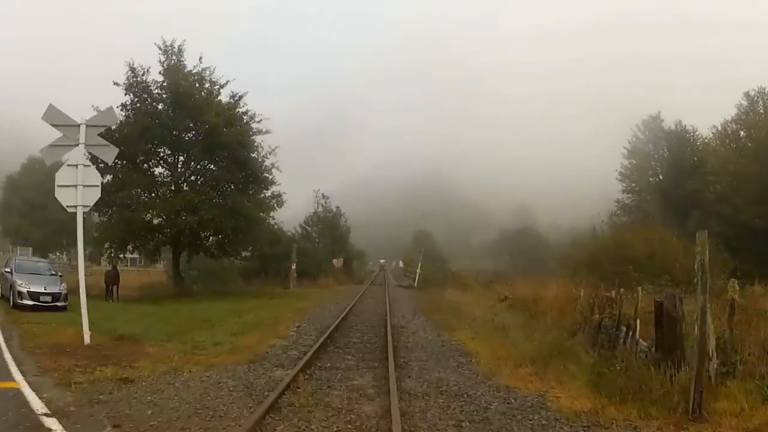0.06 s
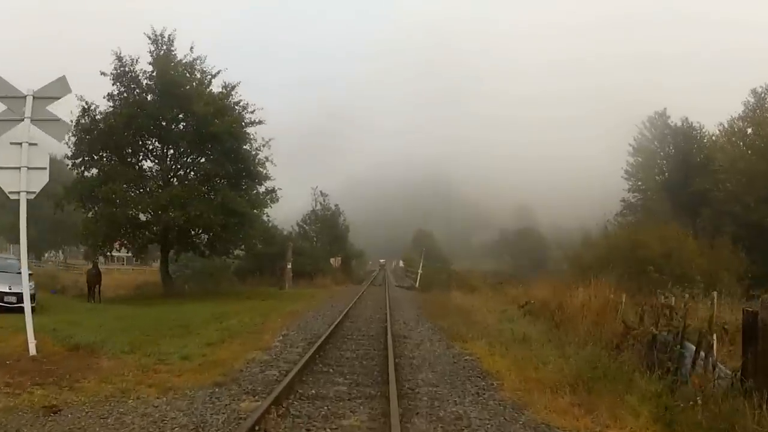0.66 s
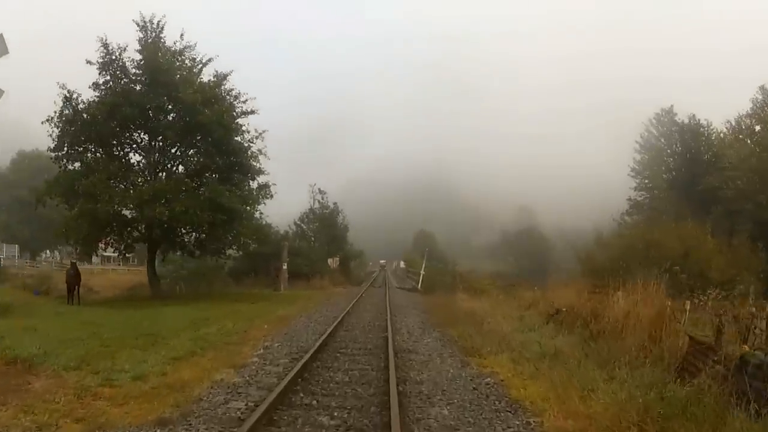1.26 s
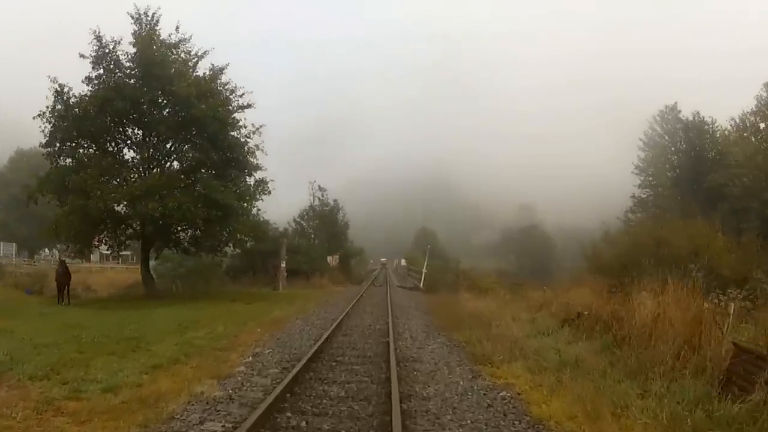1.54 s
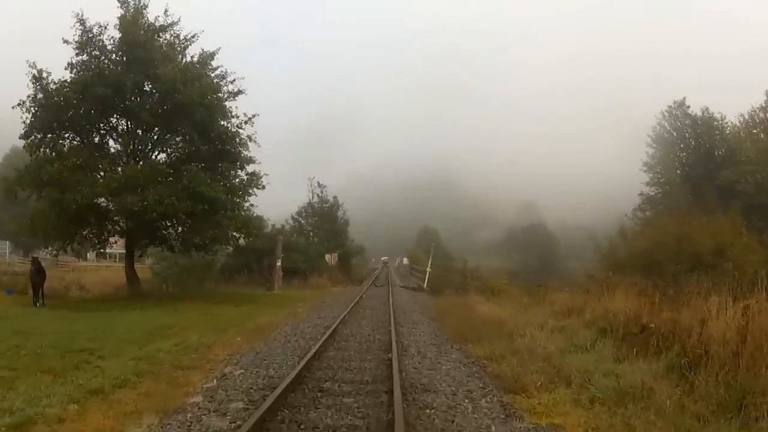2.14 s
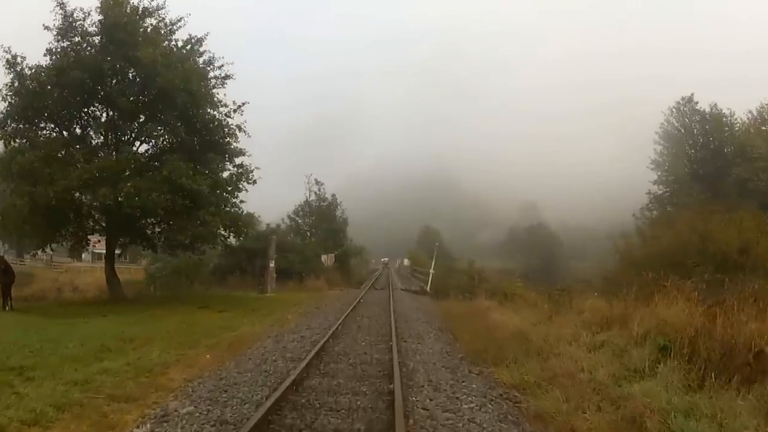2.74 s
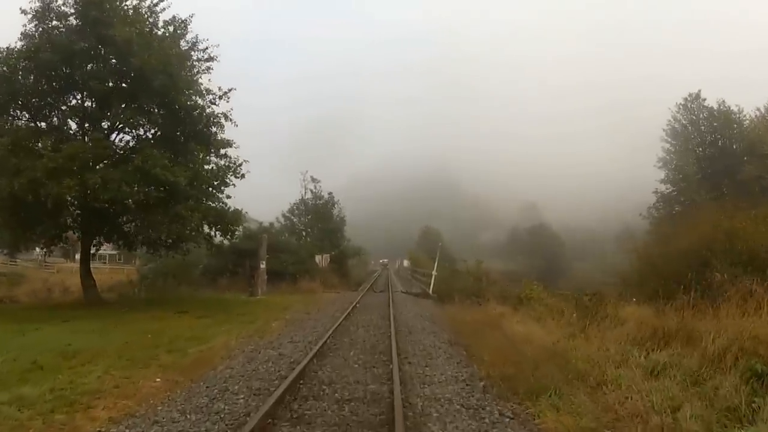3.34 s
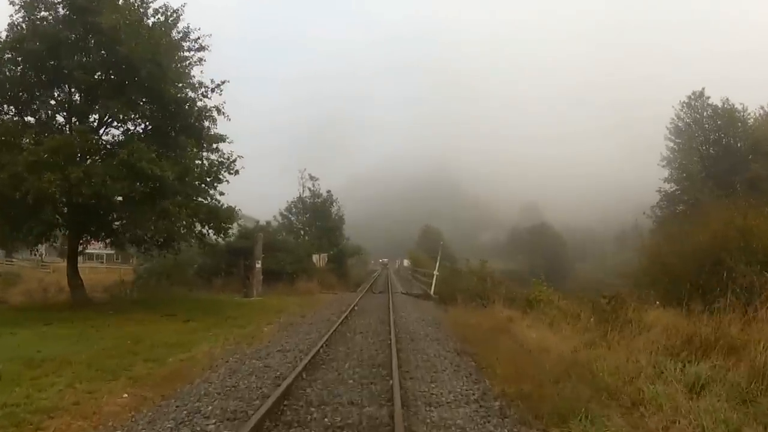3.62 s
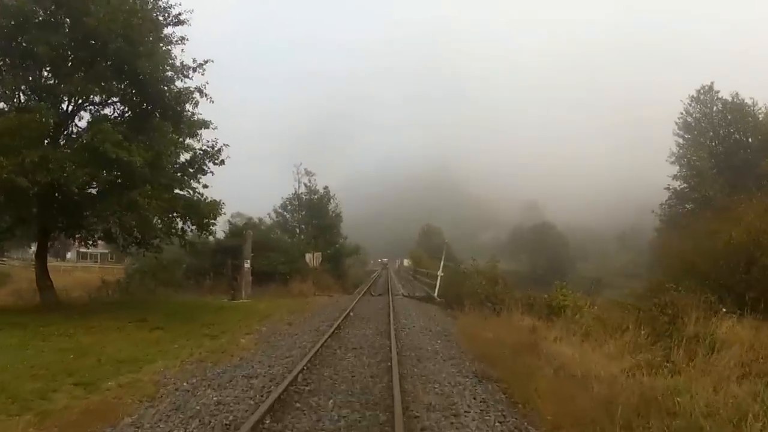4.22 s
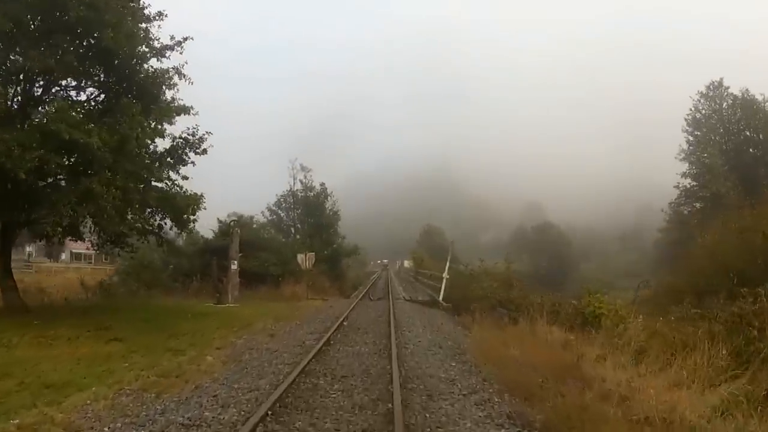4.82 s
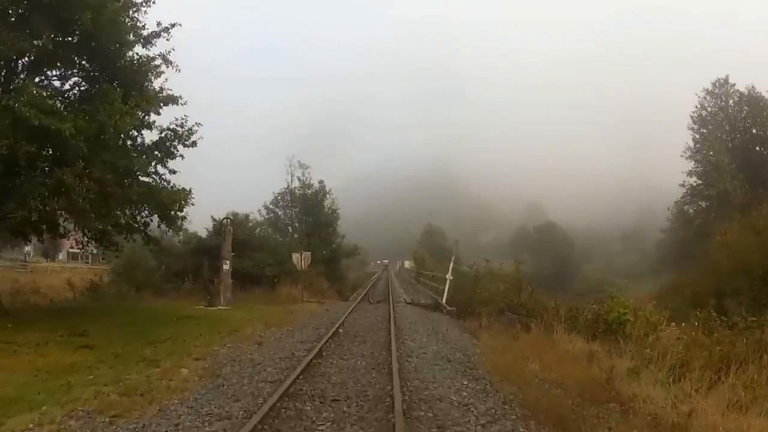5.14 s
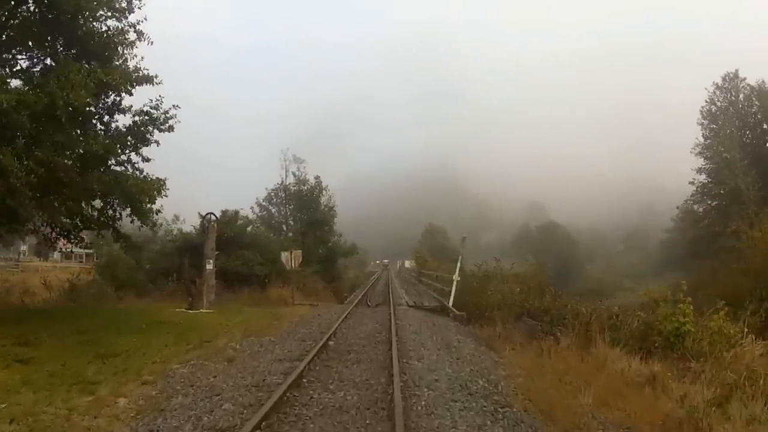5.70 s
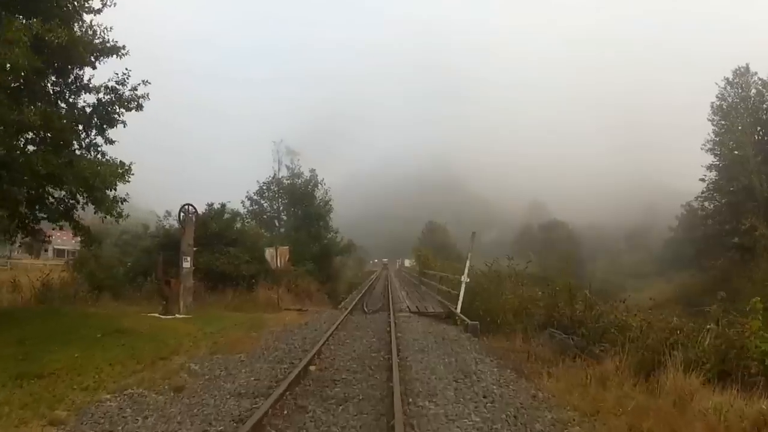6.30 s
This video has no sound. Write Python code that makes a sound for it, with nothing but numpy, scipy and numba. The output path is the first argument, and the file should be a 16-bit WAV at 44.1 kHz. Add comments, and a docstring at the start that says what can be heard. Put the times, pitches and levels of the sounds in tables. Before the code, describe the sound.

Heard from on board, a motorized rail cart's steel wheels drone and rumble on the rails while loose fittings knock.

```python
"""A small engine-powered rail cart rolls along a track at a steady speed, heard from on board.
Rough rail drives the steel wheels, frame and body into forced vibration: a drone over a rumble.
A slow engine thuds in a harmonic series, loose fittings knock, grit hisses under the treads,
a panel groans twice and a gear whines. The camera ducks after loud knocks, and its
sample-and-hold adds spectral images, heard as a thin sizzle."""
import sys
import numpy as np
from scipy import signal
from scipy.fft import rfft, irfft
from scipy.io import wavfile
from scipy.ndimage import uniform_filter1d
from numba import njit

SR = 44100
rng = np.random.default_rng(int(sys.argv[2]) if len(sys.argv) > 2 else 0)


def unload_audio(sound):
    """Save the sound as a 16-bit wav file, at the path given as the first command line argument."""
    columns = np.transpose(np.atleast_2d(sound))
    # keep every value between -1 and 1, then stretch to whole-number steps
    steps = np.round(np.clip(columns, -1, 1) * 32767)
    wavfile.write(sys.argv[1], SR, steps.astype(np.int16))


N = 284886

# normal modes of the light steel fittings: frequency_hz, bandwidth_hz, gain_db
FITTING_MODES = [(1180, 27, 3), (1285, 13, -5.5), (1557, 18, -6), (1878, 46, 0), (2051, 40, 3.5),
                 (2599, 47, 1), (2930, 41, -14), (3202, 60, 0.5), (3324, 80, -4.5), (3636, 54, -4),
                 (3870, 54, -6.5), (4320, 39, -12.5), (4886, 114, -11)]


def wheels(db, judder_db):
    """Beating: rail bumps excite the wheels' close modes, which interfere in a quick, uneven growl."""
    # normal modes of the wheels: frequency_hz, bandwidth_hz, gain_db
    wheel_modes = [(567, 27.1, -2), (592, 24.3, 1), (628, 25.6, -3.5)]
    force = bumps(rate_hz=900, scatter_db=2) * undb(judder_db * walk(70))
    return level(contact_damping(ring(force, wheel_modes), span_s=0.081), db)


def contact_damping(x, span_s):
    """Nonlinear damping: rail contact checks a growing swing, so slow swells even out and beats stay."""
    return x / np.sqrt(uniform_filter1d(x ** 2, int(span_s * SR)) + 1e-12)


def frame(firing_phase, db, shake_depth, boom_width_hz):
    """Forced vibration: bumps, modulated twice a firing, drive the frame's rumble and a deck resonance."""
    # frequency response of the frame: frequency_hz, gain_db
    frame_response = [(18, -49), (30, -27.5), (50, -8.5), (85, -6), (120, 0.5), (165, -3), (215, -6.5),
                      (255, -5.5), (290, -9), (350, -8.5), (430, -5), (650, -9), (900, -32.5),
                      (1500, -41.5), (4000, -66.5)]
    # hollow boom of the deck, drifting upward: time_s, centre_hz, level_over_rumble_db
    deck_resonance = [(0, 147.6, -7.5), (1.8, 163.6, -0.5), (2.7, 154.6, -5.5), (3.8, 193, -1.5),
                      (5, 177.6, -7), (6.46, 211.6, -7.5)]
    shaking = 1 + shake_depth * np.cos(2 * firing_phase)
    rumble = colour(shaking * bumps(rate_hz=1500, scatter_db=3.5), frame_response)
    time_s, centre_hz, boom_db = np.transpose(deck_resonance)
    carrier = np.exp(1j * phase_of(np.interp(np.arange(N) / SR, time_s, centre_hz)))
    force = shaking * bumps(rate_hz=900, scatter_db=4)
    # shifting down, low-passing and shifting back gives a narrow band with a moving centre
    lowpass = signal.butter(2, boom_width_hz / 2, fs=SR, output="sos")
    swing = (signal.sosfilt(lowpass, force / carrier) * carrier).real
    boom = level(swing, 0) * curve(np.c_[time_s, boom_db])
    return level(level(rumble, 0) + boom, db)


def body(db):
    """Modal resonance: the body's panels hum at their natural frequencies under rail bumps."""
    # normal modes of the body: frequency_hz, bandwidth_hz, gain_db
    body_modes = [(334, 27, -10.5), (461.4, 11.8, .5), (506.6, 13, -2.5), (699.6, 31, -13.5),
                  (803.3, 23, -14.5), (931, 5.6, -23.5)]
    return level(ring(bumps(rate_hz=900, scatter_db=2.5), body_modes), db)


def engine(firing_phase, uneven_db):
    """Harmonic series: the exhaust thuds once a firing, and each partial wavers with the uneven burn."""
    # exhaust spectrum: harmonic_number, gain_db
    harmonics = [(1, -22), (2, -7.5), (3, -2.5), (4, -7.5), (5, -2.5), (6, -6.5), (7, 0), (8, -2),
                 (10, -2.5)]
    # exhaust level as the engine's effort varies: time_s, level_db
    effort = [(0, -27), (1.2, -30), (2.2, -31), (3, -29.5), (4, -34), (4.6, -30.5), (5.3, -30), (6.46, -30)]
    note = 0
    for number, db in harmonics:
        amplitude = undb(db + uneven_db * walk(9))
        note = note + amplitude * np.cos(number * firing_phase + 2 * np.pi * rng.random())
    return curve(effort) * level(note, 0)


def knocks(thud_t60_s, crack_t60_s, ring_db):
    """Impact excitation: a knock is a hard crack, a clack that rings the fittings and a dull thud."""
    # knocks of wheels and loose fittings: start_s, clack_db, thud_db, clack_t60_s, crack_db
    impacts = [(0.404, -26.5, -20, .02, -45), (0.567, -28, -39, 0.017, -39), (0.897, -41, -39, 0.022, -45),
               (1.201, -22, -6.5, 0.044, -30), (1.209, -22.5, -6, 0.056, -42), (1.224, -25, -25, 0.03, -34),
               (1.595, -27, -11, 0.023, -18), (2.073, -32, -10, 0.028, -34), (2.590, -35, -9.5, 0.04, -28),
               (2.976, -33, -11.5, 0.084, -43), (3.466, -35, -16, 0.029, -49), (4.109, -32, -26, 0.04, -50),
               (4.309, -36, -30, 0.017, -40), (4.605, -30.5, -5, 0.037, -30), (5.602, -33, -31, 0.028, -47)]
    # spectrum of the metallic clack: frequency_hz, gain_db
    clack_spectrum = [(200, 2), (700, 1), (1250, 2.5), (2000, -2), (2700, 0.5), (3600, 2.5), (4500, -13.5),
                      (6000, -19.5)]
    # spectrum of the thud through the frame: frequency_hz, gain_db
    thud_spectrum = [(25, -48), (70, -18), (150, 3), (300, -10), (450, 9.5), (580, 13), (720, -20),
                     (1100, -41), (3000, -56)]
    # spectrum of the hard crack: frequency_hz, gain_db
    crack_spectrum = [(200, -17), (600, 1), (900, -0.5), (1300, 4), (1700, -6), (2100, -14), (4000, -22),
                      (4900, -20.5), (6000, -24)]
    clack, thud, crack = 0, 0, 0
    for start_s, clack_db, thud_db, clack_t60_s, crack_db in impacts:
        clack = clack + burst(start_s, clack_db, clack_t60_s)
        thud = thud + burst(start_s, thud_db, thud_t60_s)
        crack = crack + burst(start_s, crack_db, crack_t60_s)
    metal = colour(clack, clack_spectrum) + level(ring(clack, FITTING_MODES), ring_db)
    return metal + colour(thud, thud_spectrum) + colour(crack, crack_spectrum)


def treads(firing_phase, grit_db, fittings_db, flutter_db, chatter_depth):
    """Shot noise: grit crushed under the treads hisses and fittings shiver, both pulsed by the engine."""
    # spectrum of grit under steel treads: frequency_hz, gain_db
    grit_spectrum = [(400, 0), (900, -4.5), (1250, 1), (1650, -6), (2060, -2.5), (2250, -0.5), (2650, 3),
                     (3100, 0.5), (3500, -3.5), (3850, -8.5), (4300, -12), (5000, -19), (5700, -16.5),
                     (7000, -27.5)]
    chatter = 1 + chatter_depth * (np.cos(firing_phase) + np.cos(2 * firing_phase))
    load = undb(flutter_db * walk(60)) * chatter
    grit = colour(load * bumps(rate_hz=6000, scatter_db=1.5), grit_spectrum)
    shiver = ring(load * bumps(rate_hz=900, scatter_db=6), FITTING_MODES)
    return level(grit, grit_db) + level(shiver, fittings_db)


def groans(hold_s, fade_s, wobble):
    """Single-mode vibration: a panel of the body swings up briefly on one unsteady note."""
    # short groans of the body: start_s, pitch_hz, level_db
    notes = [(2.01, 424, -26.5), (4.719, 462.6, -23)]
    out = 0
    for start_s, pitch_hz, db in notes:
        tone = np.sqrt(2) * np.sin(phase_of(pitch_hz * (1 + wobble * walk(60))))
        out = out + undb(db) * swell(start_s, hold_s, fade_s, fade_s) * tone
    return out


def gear(mesh_hz, wobble, flutter_db):
    """Periodic contact: meshing teeth give a thin whine whose pitch and level waver with the load."""
    # strength of the whine: time_s, level_db
    whine_levels = [(0, -62), (1.2, -59), (2.2, -55), (3.2, -57.5), (4.4, -52), (5.3, -55), (5.7, -57),
                    (6.46, -57)]
    tone = np.sqrt(2) * np.sin(phase_of(mesh_hz * (1 + wobble * walk(40))))
    return curve(whine_levels) * tone * undb(flutter_db * walk(24.54))


def ride(turn_hz, throb_peak_s, throb_db, scatter_db):
    """Amplitude modulation: track, out-of-round wheels and timed dips vary rumble, drone and hiss."""
    # the track, smoother beyond the crossing: time_s, rumble_db, drone_db, hiss_db
    track = [(0, -24.5, -24.5, -43), (1, -24.5, -25, -44), (1.7, -27, -23.5, -47.5), (3, -28.5, -23, -45.5),
             (4.5, -27.5, -22.5, -46.5), (6.46, -26.5, -24, -45)]
    # rough patches of rail: start_s, hold_s, rumble_rise_db, hiss_rise_db
    jolts = [(0.0, 0.029, 4.5, 6), (0.137, 0.033, 3.5, 3.5), (0.31, 0.068, 5, 0), (0.479, 0.16, 4.5, 2),
             (0.851, 0.051, 3.5, 4), (0.946, 0.32, 4, 1.5), (1.372, 0.13, 3, 2), (1.546, 0.052, 5, 2),
             (1.823, 0.078, 6, 4), (1.989, 0.052, 6, 3), (2.304, .11, 6, 3.5), (2.53, 0.066, 7.5, 5.5),
             (2.967, 0.033, 5.5, 2.5), (3.173, 0.12, 5, 2.5), (3.444, .03, 4.5, 0.5),
             (3.622, .12, 4.5, 1.5), (3.824, 0.061, 5.5, 3), (4.083, 0.045, 3, 3), (4.272, 0.035, 4.5, 2),
             (4.457, 0.154, 2.5, 4), (4.82, 0.15, 6, 3.5), (5.28, 0.11, 5, 2.5), (5.46, 0.12, 3, 2),
             (5.857, 0.15, 3, 2), (6.141, 0.071, 4.5, 1), (6.326, .12, 2, 1)]
    # brief dips in level, the camera ducking after the loud knocks and lulls in the rolling noise
    # elsewhere: start_s, hold_s, drone_change_db, rumble_and_hiss_change_db
    dips = [(0.095, .05, -7.5, -1), (0.198, 0.033, -3.5, -4), (1.252, 0.051, -6, -4),
            (1.619, 0.027, -12, -4.5), (2.235, 0.042, -8, -3.5), (2.678, 0.037, -5.5, -5.5),
            (3.368, 0.047, -3, -1.5), (3.498, 0.063, -1.5, -5), (4.63, 0.065, -3.5, -1.5),
            (5.262, 0.023, -4, -1.5), (5.549, 0.024, -5, -4), (6.024, 0.027, 2.5, -3.5),
            (6.267, 0.019, 2, -5)]
    # the wheels bite the rail and ring out: start_s, rise_db
    bites = [(.172, 8), (.71, 5), (1.443, 3), (1.488, 3), (1.593, 3.5), (2.14, 1.5), (2.208, 3), (2.645, 4),
             (2.721, 6), (3.016, 5), (3.345, 6), (4.02, 4.5), (5.387, 6), (5.629, 11.5)]
    t = np.arange(N) / SR
    time_s, *columns = np.transpose(track)
    rumble_db, drone_db, hiss_db = (np.interp(t, time_s, column) for column in columns)
    drone_db += throb_db * np.cos(2 * np.pi * turn_hz * (t - throb_peak_s))  # one throb a turn
    drone_db += scatter_db * walk(25)
    for start_s, hold_s, rumble_rise_db, hiss_rise_db in jolts:
        jolt = swell(start_s, hold_s, attack_s=0.023, release_s=0.022)
        rumble_db += rumble_rise_db * jolt
        hiss_db += hiss_rise_db * jolt
    for start_s, hold_s, drone_change_db, rumble_and_hiss_change_db in dips:
        dip = swell(start_s, hold_s, attack_s=0.009, release_s=0.016)
        rumble_db += rumble_and_hiss_change_db * dip
        drone_db += drone_change_db * dip
        hiss_db += rumble_and_hiss_change_db * dip
    for start_s, rise_db in bites:
        drone_db += rise_db * swell(start_s, hold_s=0.011, attack_s=0.0047, release_s=0.0076)
    return undb(rumble_db), undb(drone_db), undb(hiss_db)


def bumps(rate_hz, scatter_db):
    """Poisson process: the rail's roughness gives tiny independent impacts of scattered size."""
    hits = rng.random(N) < rate_hz / SR
    signs = np.sign(rng.standard_normal(N))
    return hits * signs * undb(scatter_db * np.clip(rng.standard_normal(N), -2, 2))


def burst(start_s, db, t60_s):
    """Exponential decay: the noise of a rough contact falls by 60 dB in t60_s."""
    t = np.arange(SR // 5) / SR
    onset = int(start_s * SR)
    decay = np.exp(-np.log(1000) * t / t60_s)
    out = np.zeros(N + len(t))
    out[onset:onset + len(t)] = rng.standard_normal(len(t)) * undb(db) * decay
    return out[:N]


def ring(force, modes):
    """Modal superposition: damped modes alternate in sign, so the gaps between them stay filled."""
    out = 0
    for k, (hz, width_hz, db) in enumerate(modes):
        pole = np.exp((2j * np.pi * hz - np.pi * width_hz) / SR)
        out = out + (-1) ** k * undb(db) * width_hz * signal.lfilter([1], [1, -pole], force).imag
    return out


def colour(x, spectrum):
    """Minimum-phase filtering by (frequency_hz, gain_db) points, with unit gain for white noise."""
    size = 8192
    hz, db = np.transpose(spectrum)
    gain = undb(np.interp(np.log(np.fft.rfftfreq(size, 1 / SR) + 1), np.log(hz), db))
    cepstrum = irfft(np.log(gain))
    # folding the cepstrum onto positive time makes the response causal
    cepstrum[1:size // 2] *= 2
    cepstrum[size // 2 + 1:] = 0
    response = irfft(np.exp(rfft(cepstrum)))
    return signal.fftconvolve(x, response / np.linalg.norm(response))[:N]


def swell(start_s, hold_s, attack_s, release_s):
    """Trapezoidal envelope: rises to 1 by start_s, holds and falls back."""
    t = np.arange(N) / SR - start_s
    return np.clip(np.minimum(1 + t / attack_s, 1 - (t - hold_s) / release_s), 0, 1)


def walk(rate_hz):
    """Low-pass noise: random steps, smoothed twice, with a spread near 1."""
    span = int(SR / rate_hz)
    steps = np.repeat(rng.standard_normal(N // span + 1), span)
    return 1.36 * uniform_filter1d(uniform_filter1d(steps, span), span)[:N]


def phase_of(hz):
    """Phase in radians as the time integral of frequency."""
    return 2 * np.pi * np.cumsum(hz) / SR


def curve(rows):
    """Gain at every sample, interpolated from (time_s, level_db) rows."""
    return undb(np.interp(np.arange(N) / SR, *np.transpose(rows)))


def level(x, db):
    """Normalisation to an rms level."""
    return x * undb(db) / np.sqrt(np.mean(x ** 2))


def undb(db):
    """Decibels to amplitude ratio."""
    return 10 ** (np.asarray(db) / 20)


@njit
def follow(x, attack, release):
    """Envelope detection: the rectified signal is smoothed at separate rising and falling rates."""
    out, envelope = np.empty(len(x)), 0.
    for i in range(len(x)):
        size = abs(x[i])
        envelope += (size - envelope) * (attack if size > envelope else release)
        out[i] = envelope
    return out


def limiter(x, threshold_db, attack_s, release_s):
    """Peak limiting: the gain falls while the envelope exceeds the threshold."""
    envelope = follow(x, 1 / (attack_s * SR), 1 / (release_s * SR))
    return x / np.maximum(envelope / undb(threshold_db), 1)


def scene():
    """Superposition: all sources travel with the listener and add at one point."""
    firing_hz = 25.27 * (1 + 0.0077 * walk(3))
    firing_phase = phase_of(firing_hz)
    rumble_gain, drone_gain, hiss_gain = ride(
        turn_hz=6.95, throb_peak_s=0.029, throb_db=0.82, scatter_db=0.5)
    cart = engine(firing_phase, uneven_db=2.0)
    cart += gear(mesh_hz=1169, wobble=0.00735, flutter_db=2)
    cart += rumble_gain * frame(firing_phase, db=0.58, shake_depth=0.35, boom_width_hz=40.4)
    cart += drone_gain * wheels(db=-0.3, judder_db=2.5)
    cart += np.sqrt(rumble_gain * drone_gain) * body(db=-4.5)  # shaken by both frame and wheels
    cart += hiss_gain * treads(
        firing_phase, grit_db=1.05, fittings_db=-5, flutter_db=1.14, chatter_depth=0.16)
    cart += groans(hold_s=0.045, fade_s=0.0096, wobble=0.0152)
    cart += knocks(thud_t60_s=0.038, crack_t60_s=0.012, ring_db=-56.5)
    return cart[None]


def record(dry):
    """Zero-order hold: the camera limits peaks, then holds samples, mirroring sound about its clock."""
    clock_hz, cutoff_hz, oversampling = 12000, 15300, 8
    limited = limiter(dry[0], threshold_db=-11, attack_s=0.0011, release_s=0.042)
    sampled = signal.resample_poly(limited, clock_hz, SR)
    held = signal.resample_poly(np.repeat(sampled, oversampling), SR, oversampling * clock_hz)[:N]
    lowpass = signal.ellip(10, .2, 70, cutoff_hz, fs=SR, output="sos")
    return signal.sosfilt(lowpass, held)[None]


dry = scene()
out = record(dry)
unload_audio(out)
```